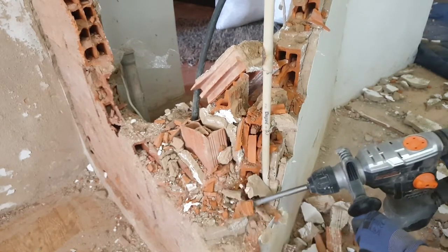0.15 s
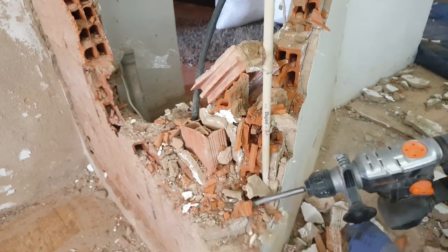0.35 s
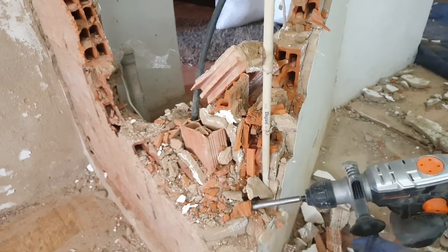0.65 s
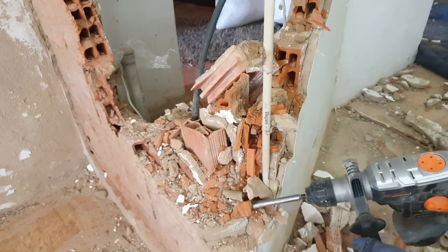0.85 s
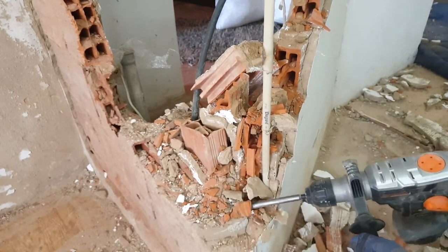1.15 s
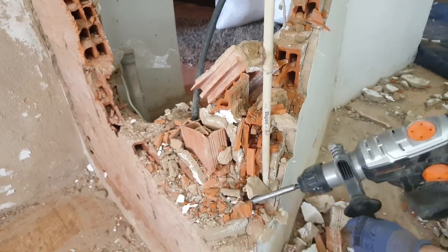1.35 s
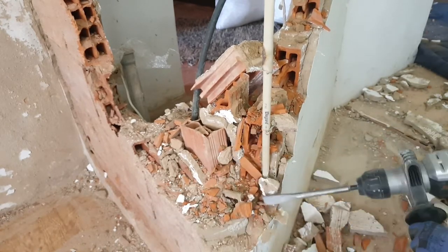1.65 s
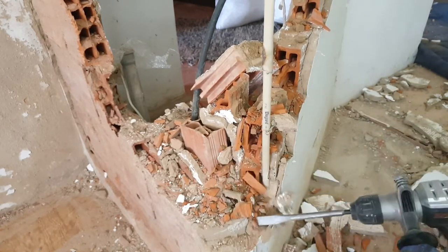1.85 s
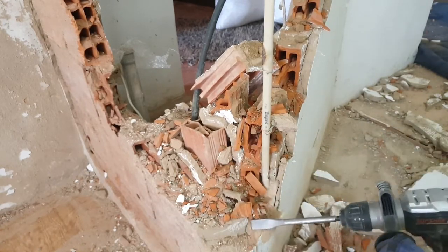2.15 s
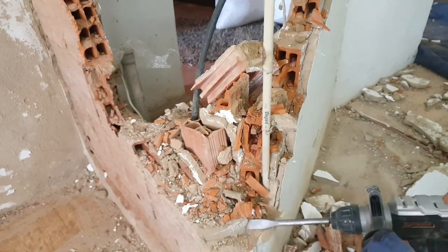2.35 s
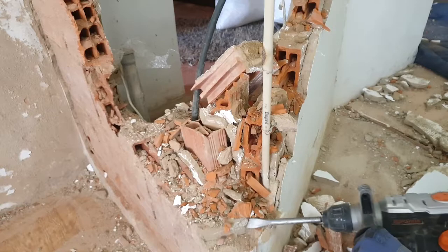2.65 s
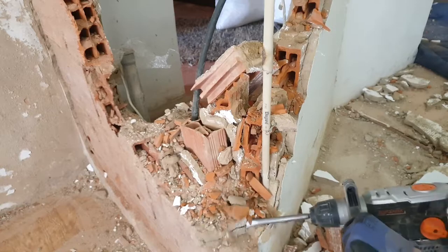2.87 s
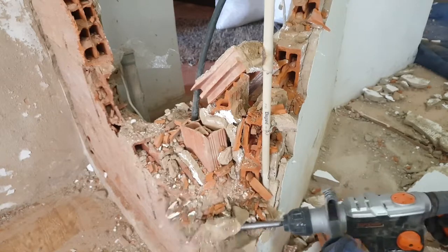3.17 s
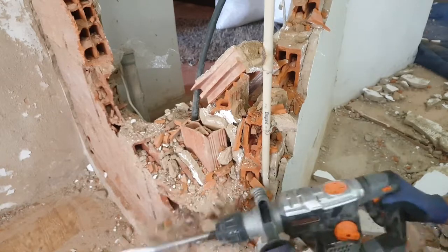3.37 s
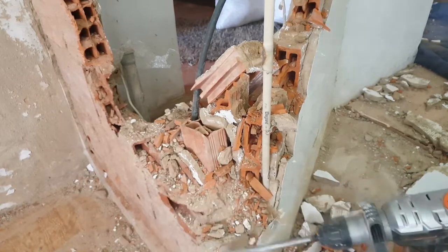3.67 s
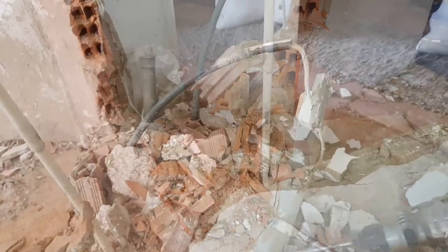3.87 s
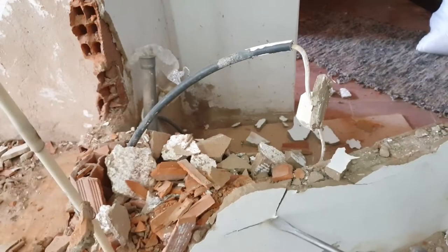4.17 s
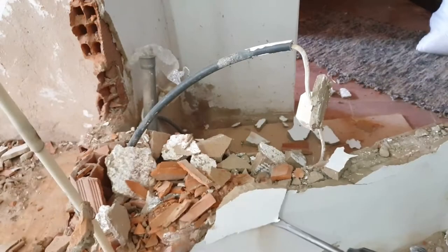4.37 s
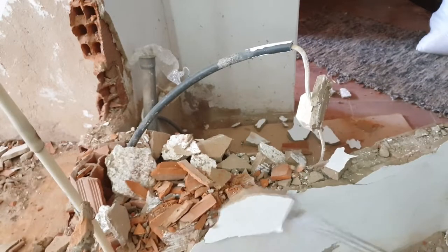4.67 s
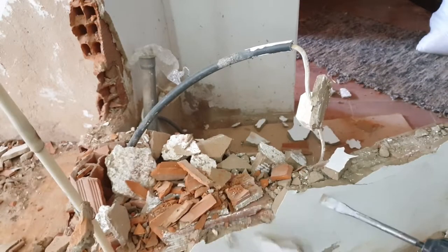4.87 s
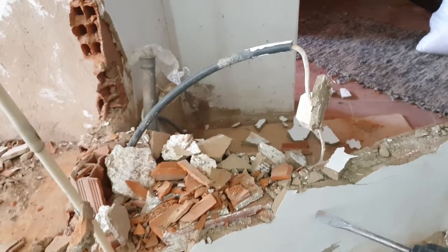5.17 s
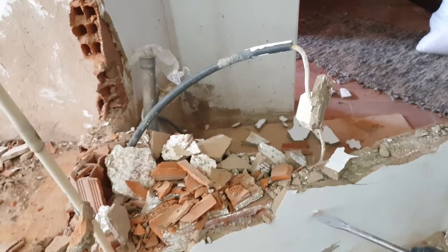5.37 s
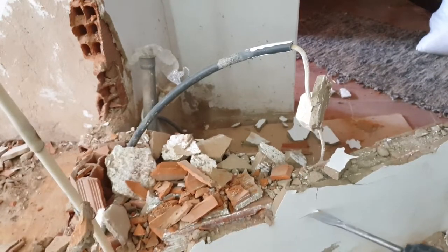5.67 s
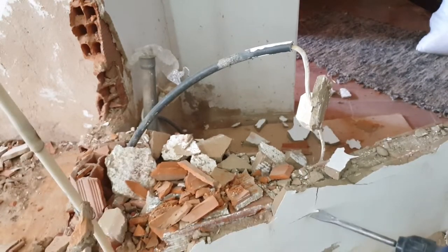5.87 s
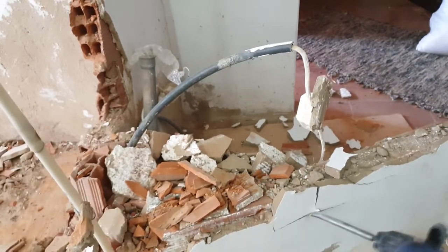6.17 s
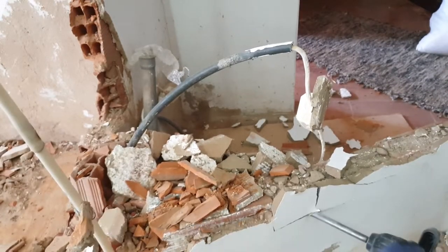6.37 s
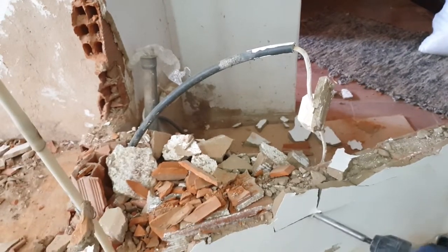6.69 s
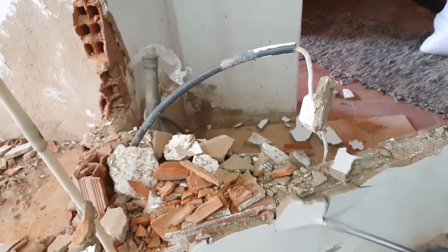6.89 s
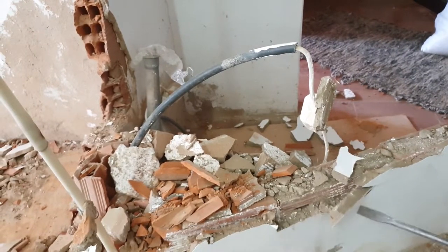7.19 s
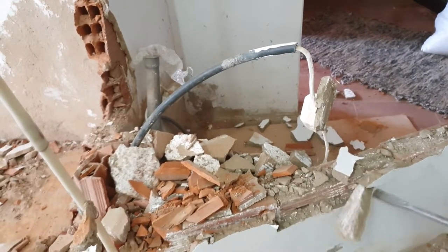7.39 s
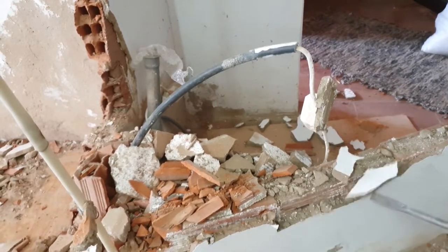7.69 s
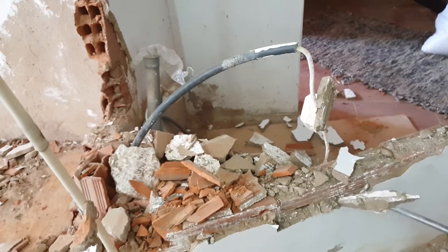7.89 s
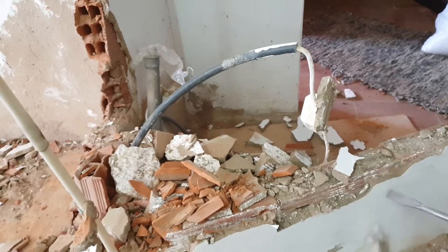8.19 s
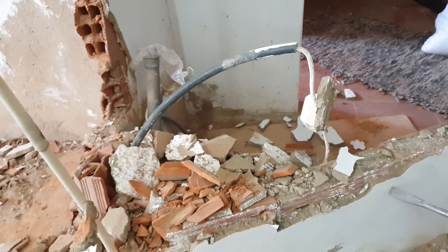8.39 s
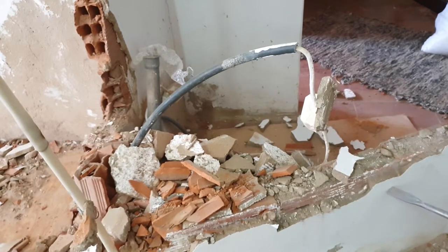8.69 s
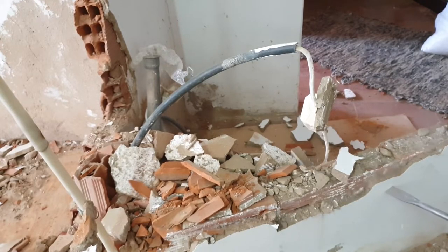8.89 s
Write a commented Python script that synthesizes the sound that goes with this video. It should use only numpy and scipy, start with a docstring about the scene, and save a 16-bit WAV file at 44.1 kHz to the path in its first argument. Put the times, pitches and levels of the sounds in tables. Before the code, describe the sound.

A rotary hammer is already at full speed, close on the right: about sixty blows a second, bright steel clang, booming hollow brick and gritty crunch, until 0.7 s. The motor whine coasts down, revs free from 1.1 to 1.5, and sinks again. Chiselling returns at 2.2, building hard with a pitched, singing crunch, to about 3.3; pieces clunk and crack at 3.1 and 3.5 as the motor slows. A short burst on the duller plastered slab runs 3.9-4.5, then winding down and a falling chunk near 5.1. A longer burst lasts 5.3-6.7, its motor easing briefly near 6.3. The whine dies away; fragments knock softly at 7.3 and 7.7 over quiet room tone, and more clunk at 8.3. The motor spins up from 8.5 into a final gritty burst, still going at the 9 s end. Bare walls add short bright echo throughout.

```python
"""Rotary hammer on a hollow brick wall

An electric rotary hammer chisels in five short bursts in a bare room, close to the right of a phone.
One motor speed drives fan, brushes, whine and piston. Each blow clangs the steel bit, thuds the wall and
crushes grit, as modal ringing and decaying noise; between bursts the motor revs free or coasts down, pieces
of brick and plaster drop on the rubble, and light touches and first slow blows of the bit tick and clunk."""
import sys
import numpy as np
from scipy import signal
from scipy.fft import rfft, irfft
from scipy.io import wavfile
from scipy.ndimage import uniform_filter1d

SR = 44100
rng = np.random.default_rng(int(sys.argv[2]) if len(sys.argv) > 2 else 0)


def pcm_store(signal):
    """Save signal as 16-bit PCM."""
    levels = np.round(np.clip(np.atleast_2d(signal), -1, 1) * 32767)
    wavfile.write(sys.argv[1], SR, levels.astype(np.int16).T)


N = 398656
TIME = np.arange(N) / SR  # s
WORKING_HZ = 62  # piston strokes per second to which levels refer

# Trigger held. Each row: start in s, end in s, top speed in strokes per s, spin-up rate near it per s.
TRIGGER = [(0, .517, 62.57, 7.82), (1.095, 1.523, 72, 5.1), (2.277, 2.995, 63.06, 7.82),
           (3.855, 4.345, 62.72, 7.82), (5.261, 6.237, 62.9, 7.82), (6.477, 6.674, 61.67, 7.82),
           (8.48, 9.1, 62.56, 7.82)]
# Bit pressed on the wall. Each row: start in s, end in s.
BURSTS = [(.0052, .67), (2.1958, 3.265), (3.8904, 4.495), (5.3077, 6.67), (8.5406, 9.04)]
# Stretches where the crunch sings at a pitch, some with a swell. Each row: start in s, end in s,
# pitch in Hz, level relative to the crunch in dB, greatest swell of the crunch in dB.
SINGING = [(0, 0.494, 1254, -2, 0), (2.425, 2.597, 1890, -19, 6.5), (2.746, 3.12, 2820, -20, 6.5),
           (3.898, 4.15, 1420, -7.5, 6.5), (4.246, 4.475, 2790, -8, 5), (5.327, 5.658, 1950, -5, 7),
           (6.195, 6.356, 840, -2, 0), (6.57, 6.72, 2820, -2, 0), (8.53, 8.84, 1680, -9.5, 6.5)]
# Spectrum of struck steel. Each row: frequency in Hz, relative level in dB.
CLANG = [(800, -35), (2500, -20), (4500, -0.5), (7500, 3), (8800, -15.5), (10500, 5), (11700, 5.5),
         (12800, 6.5), (14000, 2), (16000, -5)]


def undb(db):
    """Amplitude ratio: decibels to gain."""
    return 10 ** (np.asarray(db) / 20)


def unit(x):
    """Normalisation: scale to rms 1."""
    return x / np.sqrt(np.mean(x ** 2))


def unit_energy(x):
    """Unit energy: a response so scaled keeps the power of white noise."""
    return x / np.sqrt(np.sum(x ** 2))


def convolve(x, response):
    """Linear filtering: pass x through a response, keeping its length."""
    return signal.oaconvolve(x, response)[:len(x)]


def colour(points, size=2048):
    """Minimum phase: the causal response, by folded cepstrum, of a spectrum of (Hz, dB) points."""
    hz, db = np.transpose(points)
    bins = np.maximum(np.fft.rfftfreq(size, 1 / SR), 1)
    spectrum_db = np.interp(np.log(bins), np.log(hz), db)
    cepstrum = irfft(np.log(undb(spectrum_db)))
    cepstrum[1:size // 2] *= 2
    cepstrum[size // 2 + 1:] = 0
    return irfft(np.exp(rfft(cepstrum)))


def noise(points):
    """Filtered noise: white noise coloured by (Hz, dB) points, of rms 1."""
    return unit(convolve(rng.standard_normal(N), colour(points)))


def ring(modes, size=10000):
    """Modal superposition: damped modes (Hz, width in Hz, dB); neighbours swing in opposite directions."""
    t = TIME[:size]
    response = np.zeros(size)
    for k, (hz, width, db) in enumerate(modes):
        swing = np.exp(-np.pi * width * t) * np.sin(2 * np.pi * hz * t)
        velocity = np.gradient(swing) / hz
        response += (-1) ** k * undb(db) * width * velocity
    return unit_energy(response)


def puffs(impacts, decay_s, size=6000):
    """Energy decay: noise after each impact, drawn anew, with the expected energy of the impact."""
    decay = unit_energy(np.exp(-TIME[:size] / decay_s))
    power = convolve(impacts ** 2, decay ** 2)
    return np.sqrt(np.abs(power)) * rng.standard_normal(N)


def train(times, db, scatter_db=0):
    """Impulsive excitation: impulses at the given times, each a little stronger or weaker."""
    size = undb(db + scatter_db * rng.standard_normal(len(times)))
    return np.bincount(np.maximum(times * SR, 0).astype(int), size, N)[:N]


def walk(rate):
    """Random modulation: a wander through rate points a second, with a spread near 1."""
    return np.interp(TIME * rate, np.arange(N // 10), 1.19 * rng.standard_normal(N // 10))


def during(spans, t):
    """Gating: true where t lies in one of the spans."""
    return sum((t >= start) * (t < end) for start, end, *_ in spans) > 0


def swells(events, t):
    """Gaussian envelopes: summed gain of bell-shaped swells."""
    return sum(undb(db) * np.exp(-((t - s) / half_s) ** 2) for s, half_s, db in events)


def background():
    """Ambient noise: part common, part independent on the two sides, and a low rumble that comes and goes."""
    # Each row: frequency in Hz, relative level in dB.
    quiet_colour = [(25, -23), (55, 6.5), (100, -3), (300, -4), (1000, -28), (4000, -17), (16000, -54)]
    # Low rumble at the hand-held phone. Each row: middle in s, half length in s, level in dB.
    rumbles = [(4.3, .26, -38), (6.72, 0.61, -48.5), (8.78, 0.36, -45)]
    common = undb(-60.0) * noise(quiet_colour)
    apart = undb(-62.0) * np.array([noise(quiet_colour), noise(quiet_colour)])
    rumble = noise([(20, -31), (50, 3), (90, 3), (200, -7), (1000, -65)])
    return common + apart + (undb(-64.5) + swells(rumbles, TIME)) * rumble


def room(x, low_t60=0.67, high_t60=0.42, size=30000):
    """Reverberation: diffuse decay between bare walls; treble dies first, long waves reach both ports alike."""
    # Echo at the left and the right port. Each row: frequency in Hz, level in dB.
    echo_left = [(60, -24.5), (250, -7.5), (700, -15), (2000, -15), (5000, -15), (10000, -16.5),
                 (15000, -23)]
    echo_right = [(60, -16), (250, -11), (700, -7), (2000, -9), (5000, -11), (10000, -14), (15000, -16)]
    t, grain = TIME[:size], rng.standard_normal((3, size))
    below = signal.butter(2, 500, "low", fs=SR, output="sos")
    above = signal.butter(2, 500, "high", fs=SR, output="sos")
    grain = signal.sosfilt(below, grain[0]) + signal.sosfilt(above, grain[1:])
    low = signal.sosfilt(signal.butter(1, 3000, fs=SR, output="sos"), grain)
    low_decay = np.exp(-np.log(1000) * t / low_t60)  # down 60 dB after the given seconds
    high_decay = np.exp(-np.log(1000) * t / high_t60)
    tails = low * low_decay + (grain - low) * high_decay
    sides = []
    for tail, echo in zip(tails, (echo_left, echo_right)):
        late = unit_energy(tail * (t > .003))  # no echo in the first 3 ms
        sides.append(convolve(x, convolve(late, colour(echo))))
    return np.array(sides)


def bump(s=2.365, hz=72, decay_s=0.013, db=-9):
    """Damped oscillation: a dull knock right at the phone, as of a flying chip."""
    t = np.maximum(TIME - s, 0)
    return undb(db) * np.exp(-t / decay_s) * np.sin(2 * np.pi * hz * t)


def taps(loss=0.0075):
    """Impact excitation: light touches of the bit and first slow blows of the piston tick and ring the steel."""
    # Light touches of the bit, and the first slow blows as the piston starts.
    # Each row: time in s, relative level in dB, ring frequency in Hz.
    strokes = [(3.527, -30, 2660), (3.842, -38, 7450), (5.216, -29, 6750), (5.271, -34, 6600),
               (7.363, -43, 4570), (8.311, -43, 3930)]
    out = np.zeros(N)
    for s, db, hz in strokes:
        strike = train(np.array([s]), db + 25.0)
        steel = convolve(strike, ring([(hz, loss * hz, 0), (1.4 * hz, 2 * loss * hz, -8)]))
        tick = convolve(puffs(strike, decay_s=0.0026), unit_energy(colour(CLANG)))
        out += undb(5.5) * steel + tick
    return out


def clunks(loss=0.19, size=8000):
    """Transient and modal decay: falling pieces and first slow blows crack, clunk and scatter crumbs."""
    # Falling pieces and the clunk of first slow blows.
    # Each row: time in s, relative level in dB, ring in Hz, relative click level in dB.
    impacts = [(3.063, -16, 290, -27), (3.131, -18.5, 353, -9.5), (3.494, -13, 1640, -24),
               (3.528, -14.5, 1360, -14.5), (3.60, -28, 1830, -6), (4.757, -33.5, 547, -5.5),
               (4.997, -34, 1290, -21), (5.007, -25.5, 660, -13), (5.111, -16, 510, -31),
               (5.217, -33, 593, -9.5), (5.27, -26, 640, -12), (7.287, -21.5, 470, -15.5),
               (7.362, -29, 780, -26), (7.632, -33, 624, -31), (7.653, -29, 560, -45),
               (7.709, -16.5, 750, -24), (7.715, -22.5, 637, -15.5), (8.310, -17, 652, -29),
               (8.323, -29, 670, -12), (8.389, -25, 462, -19)]
    # Modes of a clunk. Each row: multiple of its ring frequency, relative level in dB.
    clunk_modes = [(.45, -7), (.68, -3), (1, 4), (1.27, -1), (1.748, -3), (2.45, -6), (3.4, -5), (5.1, -30)]
    out, t = np.zeros(N + size), TIME[:size]
    click_colour = unit_energy(colour([(150, 4.5), (600, 5.5), (2000, 3.5), (4000, -2.5),
                                       (8000, -15.5), (16000, -17)]))
    for s, db, hz, click_db in impacts:
        modes = [(hz * ratio, loss * hz * ratio ** 0.24, mode_db - 10 * np.log10(ratio))
                 for ratio, mode_db in clunk_modes]
        clunk = ring(modes, size=size)
        clunk = undb(4.5) * clunk / np.abs(clunk).max()
        # the level of the crumbs jumps every 60 samples
        grain = undb(4.4 * np.repeat(rng.standard_normal(size), 60)[:size])
        crumbs = 0.065 * np.exp(-t / 0.064) * grain
        click = convolve(rng.standard_normal(size) * (np.exp(-t / 0.0018) + crumbs), click_colour)
        start = int(s * SR)
        out[start:start + size] += undb(db) * (clunk + undb(click_db + 20.0) * click)
    return out[:N]


def motor_speed(count=1000):
    """Rotor dynamics, in count steps a second: the held trigger pulls it to speed; friction and drag slow it."""
    double_pull_hz = 93.6  # this far under its top speed the motor pulls twice as eagerly
    friction_hz_per_s = 30.56  # dry friction: strokes per s lost each second
    creep_hz = 1.5  # below about this speed the friction eases and the rotor creeps to rest
    fan_drag, hammer_drag = .0092, .0138  # share of the speed lost per stroke
    t = np.arange(N * count // SR + 1) / count
    top, rate = (sum(row[k] * during([row], t) for row in TRIGGER) for k in (2, 3))
    drag = fan_drag + hammer_drag * during(BURSTS, t)
    hz, speed = top[0], []  # already running at the start
    for top_hz, pull, loss in zip(top, rate, drag):
        if top_hz:
            change = pull * (top_hz - hz) * (1 + (top_hz - hz) / double_pull_hz)
        else:
            change = -friction_hz_per_s * np.tanh(hz / creep_hz) - loss * hz ** 2
        hz = max(hz + change / count, 0)
        speed.append(hz)
    return np.interp(TIME, t, speed)


def fan(pace, turns):
    """Aerodynamic noise: the rush grows steeply with speed and pulses slightly with each stroke."""
    # Each row: frequency in Hz, relative level in dB.
    fan_colour = [(100, -37.5), (200, -25.5), (370, -11.5), (530, -3), (700, -7.5), (1150, -2),
                  (1850, -0.5), (2550, 1), (4500, 1), (7100, -1), (8600, -5.5), (11500, -5), (15500, -8)]
    stroke = 1 + 0.044 * np.cos(2 * np.pi * turns)
    return undb(-21.5) * pace ** 2.66 * noise(fan_colour) * stroke


def brushes(pace):
    """Friction and arcing: the brushes rub until the rotor stops, and spark under power."""
    # Each row: frequency in Hz, relative level in dB.
    rub_colour = [(100, -16.5), (200, -7.5), (330, -0.5), (1000, -0.5), (2400, 2.5), (4000, 0),
                  (6000, -2.5), (8000, -8.5), (10000, -14.5), (15500, -13.5)]
    spark_colour = [(200, -29), (1000, -3.5), (3500, -1.5), (7000, -2.5), (15000, -16)]
    powered = uniform_filter1d(1. * during(TRIGGER, TIME), 1500)
    rub = undb(-34) * pace ** 0.39 * noise(rub_colour) * undb(1.2 * walk(60))
    sparks = undb(-34) * powered * noise(spark_colour) * undb(1.1 * walk(900))
    return rub + sparks


def whine(speed, pace):
    """Frequency modulation: a tone geared to the piston, which play in the gears roughens, most in coasting."""
    whine_hz = 157 * speed
    slack = np.clip(1 - pace, 0, .4)
    wobble_hz = 30 * walk(300) + 700 * pace * slack * walk(1400)
    angle = 2 * np.pi * np.cumsum(whine_hz + wobble_hz) / SR
    flutter = undb((3 + 6 * slack) * walk(70) - 6 * slack)
    tone = (undb(-28.0) * pace ** 6 + undb(-31.5) * pace ** 1.28) * np.sin(angle) * flutter
    # as the rotor slows, its overtones slide down into the range where the housing radiates
    for k, db in enumerate([-36.5, -36, -36.5, -37.5], 2):
        radiated = pace ** .62 / (1 + (k * whine_hz / 7000) ** 6)
        tone += undb(db) * radiated * np.sin(k * angle) * undb(2.5 * walk(40))
    return tone


def motor(speed, turns):
    """Superposition: fan, brushes and whine share one speed and one distance from the phone."""
    # The housing is held a little further off for the later bursts. Each row: time in s, gain in dB.
    nearness = [(3.4, 0.73), (4.0, -1.93)]
    pace = speed / WORKING_HZ
    sound = fan(pace, turns) + brushes(pace) + whine(speed, pace)
    return sound * undb(np.interp(TIME, *np.transpose(nearness)))


def blows(speed, turns):
    """Periodic forcing: one blow a stroke in each burst; rows of time, sway, thud, crunch and clang level."""
    # How the spot under the bit answers in each burst, at working speed. Each row: wall sway in dB,
    # crunch in dB, steel clang at the first blow in dB, fading of the clang in dB per s.
    spots = [(-36.5, -28, -17.5, 9.5), (-49.5, -32, -20.5, -1.5), (-32.5, -27.5, -16.5, 6.5),
             (-32, -27, -17.5, 4.5), (-31.5, -24, -15, 14)]
    # How firmly the bit bears on the wall: one curve a burst. Each row in it: time in s, thud in dB.
    bite = [
        [(0, -15.5), (.12, -20.5), (.42, -19), (.67, -24)],
        [(2.2, -39), (2.35, -29.5), (2.52, -22), (2.76, -23), (2.96, -37.5), (3.08, -22), (3.18, -28.5),
         (3.27, -38)],
        [(3.89, -30.5), (4.1, -21.5), (4.22, -33), (4.39, -29), (4.5, -47.5)],
        [(5.31, -31.5), (5.5, -26), (5.83, -26), (6.0, -29), (6.55, -36.5), (6.67, -28)],
        [(8.54, -29.5), (8.64, -28.5), (8.83, -28), (9.04, -24.5)],
    ]
    # The bit seats on solid masonry and the whole wall booms.
    # Each row: middle in s, half length in s, level in dB.
    booms = [(.11, 0.17, -26), (2.76, 0.088, -24.5), (3.9, 0.042, -38), (5.39, 0.032, -25.5),
             (5.79, 0.13, -32.5), (6.67, 0.078, -37), (8.55, 0.11, -26)]
    # changes of level per doubling of the speed: a slower piston clangs more softly
    clang_db_per_octave, crunch_db_per_octave = 5.5, -0.5
    crunch_follows_bite = 0.68  # dB of crunch per dB of thud
    rows = []
    for burst, spot, curve in zip(BURSTS, spots, bite):
        sway_db, crunch_db, clang_db, fade_db_per_s = spot
        strokes = np.arange(*np.interp(burst, TIME, turns))
        times = np.interp(strokes, turns, TIME)
        hz = np.interp(times, TIME, speed)
        octaves = np.log2(hz / WORKING_HZ)
        thud = np.interp(times, *np.transpose(curve))
        sway = 20 * np.log10(undb(sway_db) + swells(booms, times))
        swelling = 0
        for start, end, *_, swell_db in SINGING:
            progress = np.clip((times - start) / (end - start), 0, 1)
            swelling = swelling + swell_db * np.sin(np.pi * progress)
        crushing = crunch_db + crunch_db_per_octave * octaves
        crushing = crushing + crunch_follows_bite * (thud - thud.mean()) + swelling
        clang = clang_db + clang_db_per_octave * octaves - fade_db_per_s * (times - times[0])
        period_db = 10 * np.log10(SR / hz)  # a blow carries the energy of a whole stroke
        rows.append([times] + [db + period_db for db in (sway, thud, crushing, clang)])
    return np.hstack(rows)


def wall(times, sway_db, thud_db):
    """Modal response: low modes boom alike on every blow, and rubble lying on the wall rattles along."""
    # Modes of the whole wall, the hollow brick and the plastered slab.
    # Each row: frequency in Hz, width in Hz, relative level in dB.
    sway_modes = [(59.3, 13, -23.5), (101, 31, -7), (122.9, 36, 1.5), (145, 42.4, 1)]
    brick_modes = [(197, 80, -8.5), (250, 29, -2.5), (317.4, 26, 0.5), (446, 32, -2.5), (521, 17, -4.5),
                   (717, 73, -8), (870, 200, -13.5), (1153, 46, -7.5)]
    slab_modes = [(178, 9.6, 7.5), (237, 105, -4), (343, 48, 3.5), (400, 108, 0), (536, 30, 1),
                  (643, 68, -2.5), (875, 180, -5.5)]
    sway = convolve(train(times, sway_db, scatter_db=1.5), ring(sway_modes))
    thuds = train(times, thud_db, scatter_db=0.96)
    on_brick = TIME < 3.7  # the later bursts strike the slab
    boom = convolve(thuds * on_brick, ring(brick_modes)) + convolve(thuds * ~on_brick, ring(slab_modes))
    dull = unit_energy(colour([(30, -17), (80, -12), (250, 2), (600, 0.0), (1500, -25.0), (8000, -58)]))
    rattle = convolve(puffs(thuds, decay_s=0.014), dull)
    return sway + boom + undb(-11) * rattle


def crunch(times, crunch_db, singing_width_hz=170):
    """Fracture noise: masonry knocks alike each time, grit is crushed anew, at times singing at a pitch."""
    # Each row: frequency in Hz, relative level in dB.
    grit_colour = [(250, -2.5), (500, -14), (900, 3), (1600, 5), (2600, 3), (4500, -3.5), (8000, -19),
                   (16000, -29)]
    # Short-lived upper modes of the masonry. Each row: frequency in Hz, width in Hz, relative level in dB.
    knock_modes = [(524, 186, 1.5), (596, 250, -3), (852, 110, 1), (950, 215, 0.5), (1200, 220, -0.5),
                   (1680, 300, -4), (2480, 320, -14.5)]
    strikes = train(times, crunch_db, scatter_db=3.5)
    grit = convolve(puffs(strikes, decay_s=.0045), unit_energy(colour(grit_colour)))
    out = undb(-5) * convolve(strikes, ring(knock_modes)) + undb(-0.5) * grit
    for start, end, hz, db, _ in SINGING:
        pushes = train(times, crunch_db + db, scatter_db=2.0) * (TIME > start) * (TIME < end)
        out += convolve(puffs(pushes, decay_s=0.003), ring([(hz, singing_width_hz, 0)]))
    return out


def chisel(times, clang_db, rebound_s=0.0088):
    """Impact and resonance: the striker cracks on the ringing steel bit, which bounces back once a blow."""
    # Modes of the bit. Each row: frequency in Hz, width in Hz, relative level in dB.
    bit_modes = [(2666, 260, -17.5), (7500, 440, -17.5), (9740, 220, -15), (12420, 19, 0.5),
                 (13020, 540, -2), (13140, 290, 0)]
    jitter_s = 0.00078 * rng.standard_normal(len(times))
    rebounds = train(times + rebound_s + jitter_s, clang_db - 10, scatter_db=1)
    strikes = train(times, clang_db, scatter_db=.8) + rebounds
    crack = undb(-4) * puffs(strikes, decay_s=.0007) + undb(-5) * puffs(strikes, decay_s=.0028)
    chatter = undb(-7) * puffs(strikes, decay_s=.02)  # the bit goes on chattering in its chuck
    ringing = train(times, clang_db - 3.0, scatter_db=1.0) + rebounds
    steel = convolve(puffs(ringing, decay_s=0.0034), ring(bit_modes))
    return convolve(crack + chatter, unit_energy(colour(CLANG))) + steel


def scene():
    """Direct and reverberant field: the tool is close on the right, masonry ahead, echo on both sides."""
    # The left port lies in the shadow of the phone. Each row: frequency in Hz, level in dB.
    shadow = [(60, -8), (200, -4.5), (500, -11.5), (1200, -11), (3000, -16.5), (7000, -33), (15000, -15)]
    speed = motor_speed()
    turns = np.cumsum(speed) / SR  # piston strokes so far
    times, sway_db, thud_db, crunch_db, clang_db = blows(speed, turns)
    tool = motor(speed, turns) + chisel(times, clang_db) + taps()
    masonry = wall(times, sway_db, thud_db) + crunch(times, crunch_db) + clunks()
    # sound reaches the left port 7 samples later
    left = np.roll(convolve(tool + undb(1.5) * masonry, colour(shadow)), shift=7)
    right = tool + masonry
    # the wall is further off than the tool, so more of its sound comes by way of the room
    echo = room(tool + undb(6.0) * masonry)
    return np.array([left, right]) + echo + background() + np.outer([.25, 1], bump())


def record(dry, ceiling=0.75, low_cut_hz=36, top_hz=15900):
    """Band limiting and saturation: the phone thins deep bass, rounds the loudest peaks and cuts the top."""
    thinned = signal.sosfilt(signal.butter(2, low_cut_hz, "high", fs=SR, output="sos"), dry)
    rounded = ceiling * np.tanh(thinned / ceiling)
    return signal.sosfilt(signal.ellip(10, .2, 80, top_hz, fs=SR, output="sos"), rounded)


dry = scene()
out = record(dry)
pcm_store(out)
```